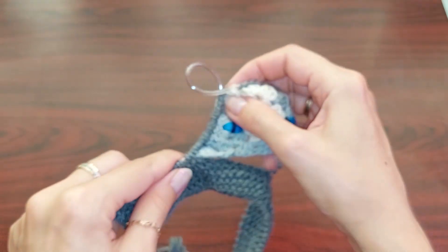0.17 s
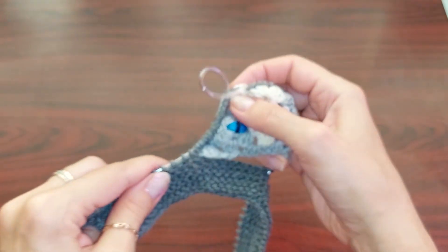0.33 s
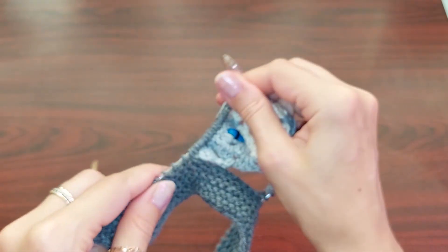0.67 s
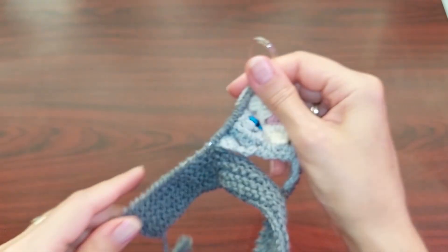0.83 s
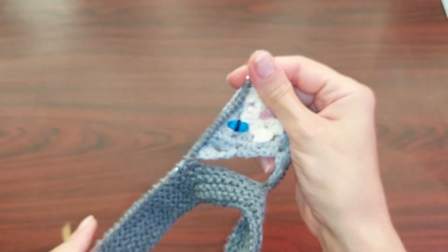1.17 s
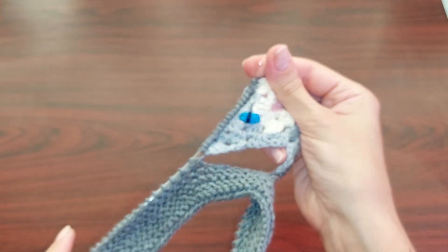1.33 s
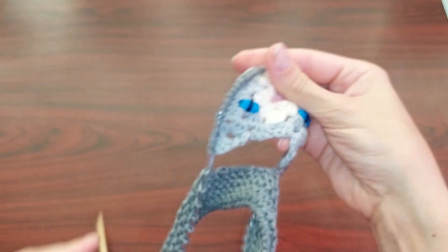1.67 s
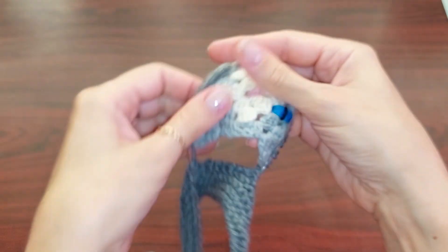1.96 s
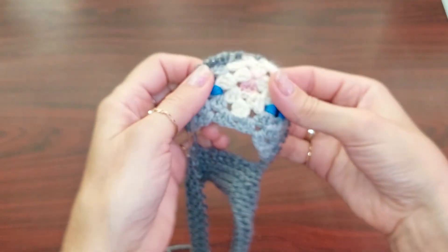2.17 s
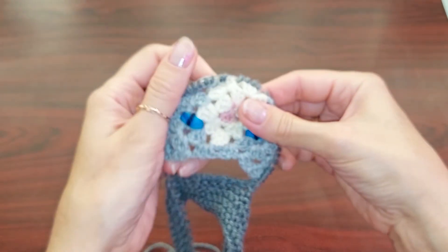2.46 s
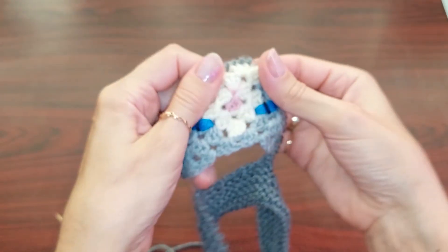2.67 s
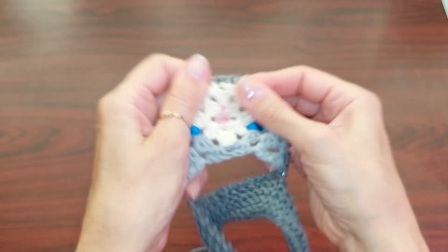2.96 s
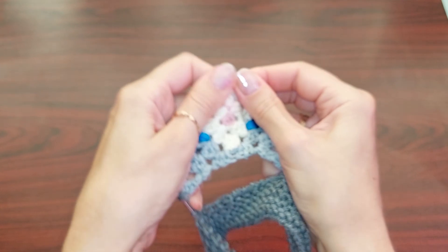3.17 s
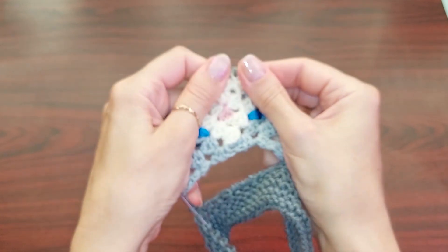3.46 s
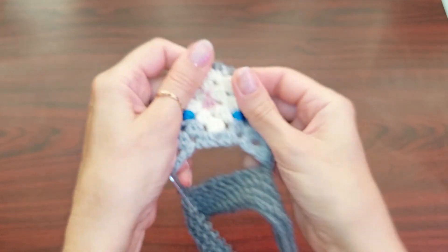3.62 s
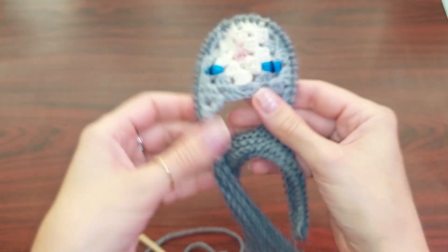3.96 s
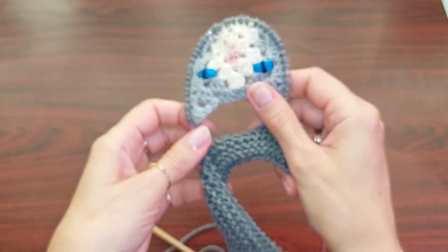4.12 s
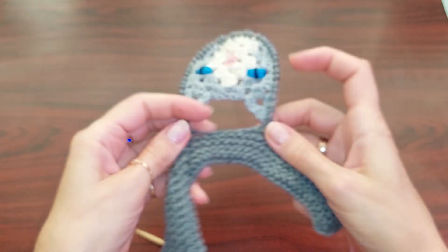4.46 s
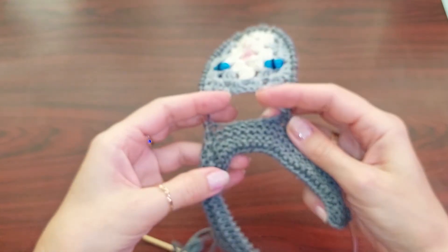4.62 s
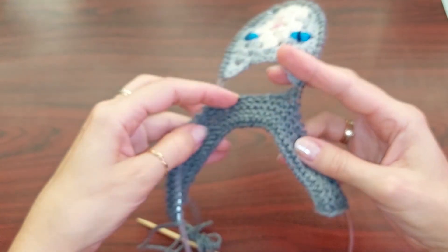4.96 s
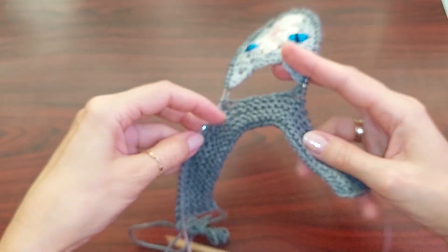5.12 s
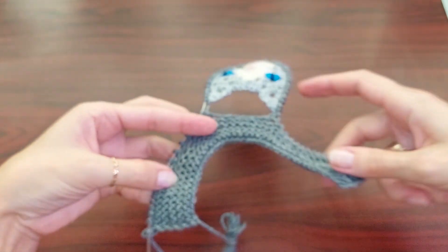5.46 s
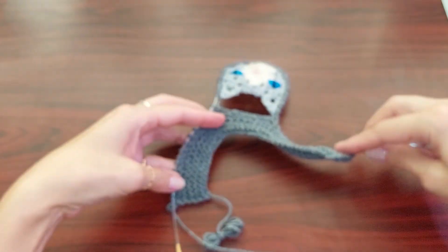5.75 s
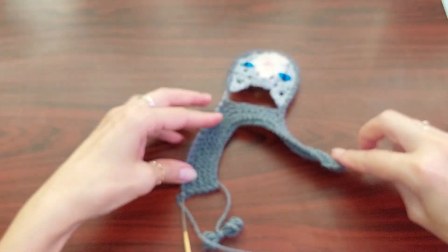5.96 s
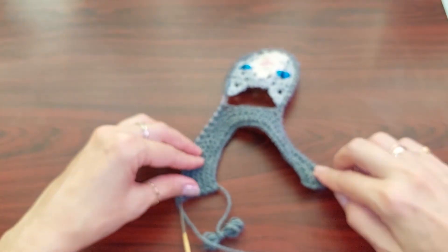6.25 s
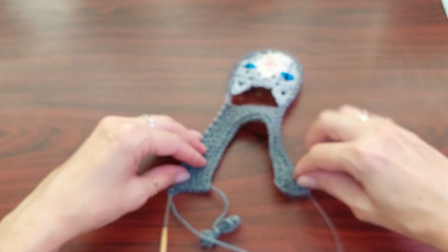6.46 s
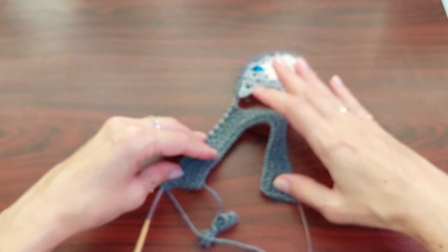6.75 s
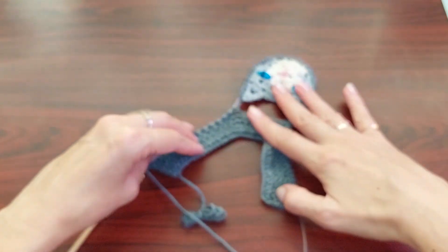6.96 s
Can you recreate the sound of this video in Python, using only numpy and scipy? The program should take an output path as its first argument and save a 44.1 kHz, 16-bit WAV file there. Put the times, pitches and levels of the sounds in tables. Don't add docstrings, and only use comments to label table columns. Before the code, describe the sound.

Knitting is handled over a tabletop, heard very near with a faint low room hush. Light needle ticks and taps come sparsely, some bright and metallic, some woody. An early quick, buzzing zip of cable through yarn swells and cuts off. Later come fingers brushing stitches, faint wooden drags, a strong ringing click followed by a soft hand thud, and a final rustle with a tap.

```python
import sys
import numpy as np
from scipy import signal
from scipy.io import wavfile
from scipy.ndimage import uniform_filter1d

SR = 44100
rng = np.random.default_rng(int(sys.argv[2]) if len(sys.argv) > 2 else 0)


def generate_wav(signal):
    frames = np.transpose(np.atleast_2d(signal))
    scaled = np.clip(frames, -1, 1) * 32767
    pcm = np.round(scaled).astype(np.int16)
    wavfile.write(sys.argv[1], SR, pcm)


N = 312565


def gain_of(db):
    return 10 ** (np.asarray(db) / 20)


def evened(x):
    return x / np.sqrt(np.mean(x ** 2) + 1e-20)


def steadied(z, share, size):
    swell = np.sqrt(abs(uniform_filter1d((abs(z) ** 2).mean(0), size=size)) + 1e-20)
    return evened(z.real / swell ** share)


def read(points, hz):
    f, value = np.transpose(points)
    return np.interp(np.log(hz + 1), np.log(f + 1), value)


def colour(x, points):
    level_db = np.maximum(read(points, abs(np.fft.fftfreq(8192, 1 / SR))), -100)
    log_gain = np.log(gain_of(level_db))
    phase = signal.hilbert(log_gain).imag
    taps = np.fft.ifft(np.exp(log_gain - 1j * phase)).real[:4096]
    return signal.oaconvolve(x, taps[None], axes=1)[:, :N]


def modes(x, table):
    return sum(gain_of(db) * signal.lfilter(*signal.iirpeak(hz, hz / width, SR), x)
               for hz, width, db in table)


def dying(s, db, t60):
    power = np.zeros(N)
    np.add.at(power, (np.asarray(s) * SR).astype(int), gain_of(db) ** 2)
    return np.sqrt(signal.lfilter([1], [1, -gain_of(-120 / (t60 * SR))], power))


# frequency in Hz, left-right correlation from 0 to 1.
CHANNEL_LIKENESS = [(60, 0.18), (180, 0.5), (550, 0.55), (1650, 0.057), (4970, 0.025), (15000, 0.023)]


def air(patchy_db):
    frames, hz = N // 256 + 5, np.fft.rfftfreq(512, 1 / SR)
    a, b, c, d, patches = rng.standard_normal((frames, 257, 5)).T
    patches = uniform_filter1d(patches, size=3, axis=0)
    patches = evened(uniform_filter1d(patches, size=16, axis=1))
    same = np.clip(read(CHANNEL_LIKENESS, hz), -1, 1)[:, None]
    left = a + 1j * b
    right = same * left + np.sqrt(1 - same ** 2) * (c + 1j * d)
    z = np.array([left, right]) * gain_of(patchy_db * patches)
    return evened(signal.istft(z, window="cosine", nperseg=512, noverlap=256)[1][:, :N])


def grainy(spread_db, per_s):
    size = np.minimum(rng.exponential(1, N), 4)
    catches = (rng.random(N) < per_s / SR) * gain_of(spread_db * size)
    patchy = air(patchy_db=2.5)
    return patchy * (1 + signal.lfilter([1], [1, -gain_of(-60 / (0.0057 * SR))], catches))


def strokes(table, attack_s=0.031):
    release_db_per_s = 193.5
    t, power = np.arange(0, N, 32) / SR, 0
    for start, length, first_db, last_db in table:
        db = np.interp(t, [start, start + length], [first_db, last_db])
        db = db - release_db_per_s * np.maximum(t - start - length, 0)
        power = power + (gain_of(db) * np.clip((t - start) / attack_s + 1, 0, 1)) ** 2
    return np.interp(np.arange(N) / SR, t, np.sqrt(power))


# start in seconds, peak in dB, then wood weight, metal sizzle
# and room tail in dB relative to the peak.
CLICKS = [(0.027, -58.5, 8.5, -14, -5.5), (0.3688, -36, -9, -3, -12.5), (0.6037, -31.5, -8, -0.3, -7),
          (1.1413, -38, -10, -14.5, -45), (1.767, -51, -25, 17.5, -24.5), (2.1294, -46.5, 0, -6, -40),
          (2.189, -46.5, -8.5, -7.5, -9.5), (2.303, -37, -18, -1.5, -10.5), (2.8417, -38, 0, 3, -11),
          (2.925, -40.5, 2, -17, -14), (3.224, -37.5, -4, -5.5, -7), (3.401, -43, -36, -12.5, -9),
          (3.535, -47, -3, 3, -9), (3.7426, -70, -0.5, -1, 1), (4.3844, -47.5, -13.5, 0, -11.5),
          (4.589, -31.5, -0.5, 7.5, -16.5), (4.7494, -51.5, -3, -2, -4.5), (5.0469, -26.5, -14, -7, -10),
          (5.5815, -18, -6.5, -4, -17.5), (6.1847, -54, 8, -43, -10), (6.344, -60, -23, -6, 3),
          (6.725, -42, -14.5, -13, -12), (2.824, -27, -15, -17, -25), (3.04, -63, 10, -18, -31),
          (3.069, -60.5, 1, -18, -22), (3.1, -54.5, -2.5, -11, -22)]
# the same five columns, in seconds and dB.
TAPS = [(0.2156, -39.5, -3, 2, -15), (0.4319, -37.5, -3, -9, -11), (0.816, -46, -38, -6, -55.5),
        (1.0248, -50, -11, -3, -10.5), (1.5466, -59, -4, -4.5, -5), (1.95, -65, 2, 8.5, -15),
        (2.4812, -45, -2.5, -9, -11.5), (2.62, -58, -0.5, -14, -6.5), (3.1944, -39.5, -6, 8, -11.5),
        (3.783, -39, -6, -8.5, -12.5), (4.0231, -42, -5, -8, -11), (4.165, -49, -2, -6, -14),
        (4.2792, -52.5, -1.5, -2, -14), (4.671, -47.5, -2, 1, -4), (5.632, -31.5, 2, -7, -16.5),
        (5.8192, -45, -14, -28, -19), (5.943, -52.5, -1.5, -13, -17.5), (6.5644, -56.5, -24.5, -4.5, -18),
        (7.0252, -34.5, -8, -5, -10)]
# low edge in Hz, high edge in Hz, ring t60 in seconds, room t60 in seconds.
TICK_PARTS = [
    (3210, 6600, 0.0079, 0.31),
    (217, 910, 0.0099, 0.4),
    (1300, 3060, 0.0049, 0.35),
    (7780, 21900, 0.013, 0.21),
]
# frequency in Hz, level in dB.
NEEDLE_COLOUR = [(150, -8), (320, 5.5), (550, 5), (850, -3.5), (1400, -2.5), (2000, -4), (3000, -5.5),
                 (4600, -6.5), (6200, -6.5), (7200, -1.5), (8400, 5), (10000, 0.5), (12000, 7), (15500, -6)]


def ticks():
    s, bright_db, wood_db, sizzle_db, tail_db = np.transpose(CLICKS + TAPS)
    knock_db = wood_db + np.repeat([-20, -12], [len(CLICKS), len(TAPS)])
    part_db = [bright_db, bright_db + knock_db, bright_db + wood_db, bright_db + sizzle_db]
    crack_s, tail_delay_s = 0.013, 0.0025
    near, far = air(patchy_db=2.0), air(patchy_db=1.5)
    out = 0
    for (lo, hi, ring, t60), db in zip(TICK_PARTS, part_db):
        crack = uniform_filter1d(dying(s, db + 0.5, crack_s), size=16, origin=7)
        direct = np.hypot(crack, dying(s, db - 17.0, ring))
        early = dying(s, db + tail_db - 8.0, 0.46 * t60)
        late = uniform_filter1d(dying(s + tail_delay_s, db + tail_db + 4.5, t60), size=90)
        burst = near * direct + far * np.hypot(early, late)
        burst[:, (s * SR).astype(int)] += gain_of(db + 2.0)
        band = signal.butter(N=3, Wn=[lo, hi], btype="band", fs=SR, output="sos")
        out = out + signal.sosfilt(band, burst) * np.sqrt(SR / 2 / (hi - lo))
    return colour(out, NEEDLE_COLOUR)


def singing(table, width_hz, below_db, alike):
    t, out = np.arange(SR // 3) / SR, np.zeros((2, N + SR))
    for s, db, hz, t60 in table:
        line = modes(rng.standard_normal((2, len(t))), [(hz, width_hz, 0)])
        line = steadied(line, 0.6, size=int(SR / width_hz))
        line[1] = alike * line[0] + np.sqrt(max(1 - alike ** 2, 0)) * line[1]
        decay = gain_of(-60 * t / t60) + gain_of(9.5 - 60 * t / 0.012)
        fade = gain_of(db - below_db) * decay * np.minimum(t * hz / 3, 1)
        out[:, round(s * SR):][:, :len(t)] += line * fade
    return out[:, :N]


# start in seconds, peak in dB, frequency in Hz, t60 in seconds.
RINGS = [(0.2148, -48.5, 1300, 0.33), (0.432, -38.5, 1770, 0.27), (0.602, -69, 1480, 0.28),
         (0.815, -49, 1330, 0.3), (1.024, -53.5, 1600, 0.83), (2.3017, -51, 2670, 0.46),
         (2.481, -49.5, 1640, 0.27), (2.8409, -39, 1970, 0.38), (2.9253, -71, 1600, 0.2),
         (3.2246, -36.5, 2030, 0.28), (3.3998, -53.5, 1660, 0.47), (4.0223, -97, 1750, 0.35),
         (4.588, -29.5, 1930, 0.28), (5.0466, -34.5, 1990, 0.39), (5.5807, -20.5, 2003, 0.24),
         (6.1848, -46, 1940, 0.53), (4.166, -53.5, 1380, 0.34), (4.279, -58, 1570, 0.3),
         (2.621, -58, 1695, 0.74), (6.7244, -55, 1790, 1), (4.39, -59, 2650, 0.7), (5.47, -56.5, 2020, 0.7),
         (5.258, -53.5, 1450, 1), (5.38, -55.5, 1573, .4)]
# start in seconds, peak in dB, frequency in Hz, t60 in seconds.
PINGS = [(0.3691, -37.5, 6660, 0.19), (0.4334, -32, 8150, 0.28), (0.605, -22, 8540, 0.3),
         (1.7674, -34.5, 7300, 0.041), (2.3027, -45, 4800, 0.19), (2.8414, -30, 4000, 0.28),
         (3.1946, -30.5, 5800, 0.21), (3.2241, -25, 6460, 0.26), (3.5349, -32.5, 5140, 0.27),
         (4.588, -20, 4180, 0.25), (5.0469, -29, 8470, 0.32), (5.5807, -12, 4710, 0.27),
         (7.0259, -30.5, 8140, 0.14), (5.755, -35, 3500, 0.23), (4.3845, -39.5, 6560, 0.18),
         (4.166, -53, 3400, .1)]
# start in seconds, peak in dB, frequency in Hz, t60 in seconds.
KNOCKS = [(0.215, -39.5, 280, 0.46), (0.43, -46, 544, 0.54), (0.603, -40.5, 278, 0.56),
          (0.814, -49.5, 242, 0.37), (1.024, -59, 423, 0.33), (2.482, -64, 580, 0.28),
          (3.193, -46, 474, 0.54), (3.783, -47, 607, 0.91), (4.165, -49, 374, 0.21),
          (4.278, -51.5, 335, 0.41), (4.672, -40, 337, 0.5), (5.045, -46.5, 330, 0.55),
          (5.634, -36, 232, 0.47)]


def ringing_modes():
    lines = singing(RINGS, width_hz=170, below_db=10.5, alike=0.18)
    lines += singing(PINGS, width_hz=800, below_db=18.0, alike=0.28)
    lines += singing(KNOCKS, width_hz=45, below_db=15.0, alike=0.81)
    return lines


# start in seconds, strength in dB.
SLACK_SLIPS = [(1.1781, -60.6), (1.1804, -40.8), (1.1857, -40.9), (1.1889, -39.5), (1.1919, -40.3),
               (1.1974, -39.8), (1.2006, -39.3), (1.2049, -39.1), (1.2076, -45.4), (1.2117, -37.2),
               (1.2143, -38.9), (1.2171, -39.0), (1.22, -37.9), (1.2229, -37.8), (1.2265, -38.2),
               (1.2304, -38.2), (1.2359, -37.6), (1.2388, -36.4), (1.242, -37.7), (1.2447, -37.1),
               (1.2473, -38.9), (1.2503, -37.2), (1.2533, -38.4), (1.2563, -36.4), (1.2593, -44.7),
               (1.262, -34.6), (1.2644, -36.3), (1.2671, -36.8), (1.27, -37.4), (1.2731, -38.9),
               (1.276, -34.2), (1.2797, -36.7), (1.2822, -36.3), (1.286, -38.2), (1.289, -36.4),
               (1.2922, -35.2), (1.2964, -34.5), (1.2999, -38.2), (1.3022, -35.1), (1.3059, -36.4)]
# start in seconds, strength in dB.
TAUT_SLIPS = [(1.3132, -31), (1.3156, -33), (1.3221, -30), (1.3291, -29), (1.3369, -29), (1.3432, -29),
              (1.3515, -28), (1.3607, -26), (1.3677, -27), (1.3746, -27), (1.3835, -26), (1.3873, -26),
              (1.3947, -24), (1.4018, -24), (1.408, -25), (1.413, -25), (1.4168, -25), (1.42, -27),
              (1.4235, -25), (1.4262, -28), (1.4289, -27), (1.4313, -28), (1.4343, -29)]
# frequency in Hz, t60 in seconds, level in dB while slack, level in dB once taut.
CABLE_MODES = [(1078, 0.007, -5, -1.5), (1871, 0.004, 3.2, 5.6), (2448, 0.003, 11.6, 9.5),
               (3560, 0.007, -6, -6), (4480, 0.0059, 0.5, -1), (5775, 0.0032, 10.9, 5.3),
               (6950, 0.004, 3, -5), (8100, 0.003, 9, 2.5), (10600, 0.0025, 5, -2), (12100, 0.0025, 6, -1)]


def rasp():
    s, db = np.transpose(SLACK_SLIPS + TAUT_SLIPS)
    tighten_s, tighten_length_s, fuller_db_per_s = 1.295, 0.04, 80
    taut = np.clip((s - tighten_s) / tighten_length_s, 0, 1)
    t, out = np.arange(600) / SR, np.zeros((2, 2 * SR))
    scatter_db, detune = rng.standard_normal((90, 2, 2, len(CABLE_MODES), 1)).swapaxes(0, 1)
    scatter_db, detune = 0.8 * scatter_db, 1 + 0.004 * detune
    onset = np.minimum(t / 0.0006, 1)
    hz, t60, slack_db, taut_db = np.transpose(CABLE_MODES)[..., None]
    order = np.arange(len(hz))[:, None]
    lag = np.where(order < 3, np.pi * (order == 2), np.pi / 2 * order)
    scratch = np.diff(rng.standard_normal((90, 2, len(t) + 1)))
    scratch = scratch * gain_of(-60 * t / 0.006) * onset
    for k, at in enumerate((s * SR).astype(int)):
        level_db = db[k] + slack_db + taut[k] * (taut_db - slack_db) + scatter_db[k]
        level_db[:, 0] += fuller_db_per_s * (s[k] - s.max())
        rings = gain_of(level_db - 60 * t / t60) * np.sin(2 * np.pi * hz * detune[k] * t + lag)
        scrape = scratch[k] * gain_of(db[k] - 3.5 - 5.7 * taut[k])
        out[:, at:at + len(t)] -= rings.sum(1) * onset + scrape
    direct = signal.sosfilt(signal.butter(N=4, Wn=600, btype="high", fs=SR, output="sos"), out)
    direct = direct + gain_of(-18) * np.roll(direct, round(0.0021 * SR), axis=1)
    t = np.arange(SR // 4) / SR
    tail = rng.standard_normal((2, 3, len(t)))
    tail = tail * (gain_of(-36.0 - 60 * t / 0.077) + gain_of(-38.0 - 60 * t / 0.23))
    a, b = int(s.min() * SR), int(s.max() * SR) + 600
    turn, wet = np.arange(b - a) * np.pi * 30 / SR, np.zeros((2, 2 * SR))
    for k in range(3):
        moving = direct[:, a:b] * np.cos(turn + k * np.pi / 3)
        echoes = signal.fftconvolve(moving, tail[:, k], axes=1)
        wet[:, a:a + echoes.shape[1]] += echoes
    return np.pad(gain_of(-3.0) * (direct + wet), [(0, 0), (0, N - 2 * SR)])


# time in seconds, level in dB, first bar mode
# in Hz, upper modes in dB relative.
DRAGS = [
    [(2.66, -73, 553, 10), (2.688, -66, 560, -6), (2.714, -76, 566, 4), (2.75, -61.5, 564, 5),
     (2.77, -72, 550, 14), (2.784, -55.5, 604, -0.5), (2.806, -63, 560, -6), (2.835, -72, 577, 6)],
    [(3.778, -50, 597, 3), (3.794, -55, 615, -3), (3.816, -63, 570, -4), (3.844, -65, 580, 2),
     (3.85, -63, 537, -9), (3.888, -59, 605, -1.5), (3.934, -56.5, 530, -2.5), (3.962, -56, 593, -5),
     (3.98, -69, 610, 1)],
    [(6.88, -64, 600, 8), (6.89, -69, 527, 9), (6.912, -60.5, 647, -8), (6.928, -54, 595, 4),
     (6.936, -61, 570, 3), (6.944, -57, 590, 3), (6.956, -61.5, 464, 5), (6.998, -55.5, 467, -4),
     (7.03, -60, 475, 3)],
]
# ratio to the first mode, width in Hz, level in dB.
BAR_MODES = [(1.0, 75, 0), (2.8, 260, -1.5), (5.1, 500, -8)]


def drag():
    out = np.zeros((2, N))
    stutter = grainy(spread_db=7.0, per_s=130)
    for rows in map(np.array, DRAGS):
        a, b = (rows[[0, -1], 0] * SR).astype(int)
        t = np.arange(a, b) / SR
        level_db, hz, upper_db = (np.interp(t, rows[:, 0], c) for c in rows.T[1:])
        for k, (ratio, width, db) in enumerate(BAR_MODES):
            turn = np.exp(2j * np.pi * np.cumsum(ratio * hz) / SR)
            r = np.exp(-np.pi * width / SR)
            line = turn * signal.lfilter([1], np.poly([r, r]), stutter[:, a:b] / turn)
            gain = gain_of(level_db + db + (k > 0) * upper_db) * signal.windows.tukey(b - a, 0.04)
            out[:, a:b] += steadied(line, 0.7, size=500) * gain
    return out


# start in seconds, length in seconds, level in dB at start, level in dB at end,
# tip hiss in dB relative.
SKIDS = [
    (6.8, 0.073, -68, -57, -15),
    (6.352, 0.068, -61, -57.5, 3.5),
    (2.935, 0.016, -51.5, -74, 4.5),
    (3.235, .05, -54, -58, -13),
]
# start in seconds, length in seconds, level in dB at start, level in dB at end.
HEAVY_SKIDS = [(6.192, 0.058, -55, -60), (5.91, 0.07, -74, -65), (.825, .04, -73, -71),
               (3.24, 0.06, -60, -63), (5.26, 0.14, -67, -68), (5.73, 0.06, -66, -63),
               (6.83, 0.07, -64, -60), (2.86, .03, -65, -66), (1.77, .06, -72, -72)]
# frequency in Hz, width in Hz, level in dB.
SHAFT = [(1530, 590, -6.5), (1940, 310, 2), (2400, 1000, -2)]
# frequency in Hz, width in Hz, level in dB.
TIP = [(4970, 1100, -1), (6900, 6900, 0)]
# frequency in Hz, width in Hz, level in dB.
BOARD = [(990, 180, 1), (1330, 350, -3)]


def skid():
    shaft = evened(modes(modes(grainy(spread_db=-18.0, per_s=290), SHAFT), SHAFT))
    tip = evened(modes(modes(grainy(spread_db=-7.0, per_s=53), TIP), TIP))
    board = evened(modes(modes(grainy(spread_db=2.0, per_s=83), BOARD), BOARD))
    shaft_strokes = [row[:4] for row in SKIDS]
    tip_strokes = [(s, length, a + db, b + db) for s, length, a, b, db in SKIDS]
    out = board * strokes(HEAVY_SKIDS, attack_s=0.0047)
    out = out + shaft * strokes(shaft_strokes, attack_s=0.009)
    return out + tip * strokes(tip_strokes, attack_s=0.016)


# start in seconds, length in seconds, level in dB at start,
# level in dB at end, yarn fuzz in dB relative.
RUBS = [(0.0, 0.13, -72.5, -61, -6), (0.26, 0.045, -63, -62, 3.5), (0.835, 0.02, -65.5, -70.5, 4),
        (1.046, 0.37, -61.5, -59, 1), (1.471, 0.16, -66.5, -67.5, -0.5), (1.729, 0.048, -71.5, -57.5, 2),
        (1.942, 0.19, -71, -65, 2.5), (2.316, 0.068, -56.5, -54.5, 3.5), (2.623, 0.17, -76, -63.5, -5),
        (2.913, 0.23, -71, -78, 2.5), (3.424, 0.039, -73, -67, -23), (3.56, 0.14, -86, -77.5, 6),
        (3.76, 0.14, -70, -56, -0.5), (4.02, 0.14, -59, -74.5, -2), (4.362, .12, -85, -69.5, 7),
        (4.614, 0.14, -41, -58, -6), (4.749, 0.04, -52.5, -61, -2.5), (5.08, 0.18, -57, -63, 1),
        (5.258, 0.14, -61.5, -61.5, -1), (5.435, 0.16, -65, -65, -4), (5.67, 0.11, -53.5, -58, -2),
        (5.89, 0.041, -70, -65, -9), (6.77, 0.047, -70, -56, -5), (6.831, 0.087, -51.5, -50.5, -0.5),
        (6.946, 0.07, -55, -56, -8.5), (7.038, 0.06, -52, -53, -5)]
# start in seconds, length in seconds, level in dB at start,
# level in dB at end.
SLIDES = [(0.25, 0.085, -63, -93), (0.82, 0.043, -65.5, -70), (1.04, 0.15, -63.5, -77),
          (1.24, 0.045, -69, -65), (1.47, 0.02, -63, -74), (1.78, .03, -70, -73), (2.0, 0.28, -76, -84),
          (2.32, 0.064, -65.5, -88), (2.63, 0.23, -88, -77), (2.93, 0.084, -66.5, -80),
          (3.78, 0.15, -65.5, -69), (4.01, 0.079, -66, -81), (4.63, 0.1, -56.5, -67),
          (4.745, 0.024, -54, -77), (5.1, 0.13, -66.5, -85), (5.68, 0.37, -63.5, -80.5),
          (5.9, 0.17, -68.5, -78.5), (6.2, 0.14, -71.5, -87), (6.83, 0.067, -74.5, -64.5),
          (6.93, 0.08, -62, -63), (7.04, 0.06, -59, -55), (6.36, 0.11, -81, -75.5), (3.23, 0.058, -66, -64)]
# frequency in Hz, width in Hz, level in dB.
SLIDE_MODES = [(337, 126, 4.5), (500, 200, 1.5), (714, 470, -4)]
# frequency in Hz, width in Hz, level in dB.
RUB_MODES = [(1240, 610, -2), (1720, 860, 5.5), (2680, 1000, 0.5), (3400, 1400, -3.5)]
# frequency in Hz, level in dB per Hz.
FUZZ_COLOUR = [(2500, -13), (3500, -6.5), (5000, 4), (8000, 2), (12000, -2), (16000, -4)]


def handling():
    slide = evened(modes(modes(grainy(spread_db=0.5, per_s=120), SLIDE_MODES), SLIDE_MODES))
    rub = evened(modes(modes(grainy(spread_db=-5.0, per_s=76), RUB_MODES), RUB_MODES))
    fuzz = evened(colour(grainy(spread_db=1.0, per_s=360), FUZZ_COLOUR))
    fingers = [row[:4] for row in RUBS]
    fibres = [(s, length, a + db, b + db) for s, length, a, b, db in RUBS]
    return slide * strokes(SLIDES) + rub * strokes(fingers) + fuzz * strokes(fibres)


# start in seconds, frequency in Hz, t60 in seconds, level in dB.
THUDS = [
    (5.634, 135, 0.12, -36),
]


def thud():
    (s, hz, t60, db), = THUDS
    t = np.maximum(np.arange(N) / SR - s, 0)
    return gain_of(db - 60 * t / t60) * np.sin(2 * np.pi * hz * t) * np.minimum(t / 0.0071, 1)


# frequency in Hz, level in dB per Hz.
HUSH_COLOUR = [(24, -38.5), (40, -5), (159, -5), (252, -17), (291, -9), (389, -18.5), (533, -21),
               (601, -22), (712, -25), (1370, -27.5), (4070, -36.5), (6760, -36), (13000, -32)]


def room_hush():
    return gain_of(-73) * evened(colour(air(patchy_db=0.3), HUSH_COLOUR))


# time in seconds, left-right difference in dB.
HAND_PLACE = [(0.0, 0.5), (0.83, 1), (1.009, 0.5), (1.93, 2.5), (2.11, 1), (4.641, 0.5), (5.051, 0),
              (5.942, 0), (6.0, 1), (7.09, 0.5)]


def scene():
    place_db = np.interp(np.arange(N) / SR, *np.transpose(HAND_PLACE))
    side = gain_of(np.outer([0.5, -0.5], place_db))
    hands = ticks() + ringing_modes() + rasp() + drag() + skid() + handling()
    return hands * side + thud() + room_hush()


def low_pass(x):
    return signal.sosfilt(signal.butter(12, 17150, fs=SR, output="sos"), x)


# frequency in Hz, level in dB.
MIC_DIPS = [(600, 0), (850, -2.5), (1150, 0), (2000, -0.5), (2300, -1.5), (3600, -0.5), (4080, -4),
            (4500, -0.5)]
# frequency in Hz, left-right difference in dB.
MIC_LEAN = [(40, -2), (150, 0), (550, 1.8), (1650, 1.5), (4970, -.8), (15000, -2.3)]
# treble level in dB, edge in Hz.
TREBLE_EDGE = [(-116, 12900), (-104, 13600), (-92, 14300), (-80, 15000), (-70, 15700), (-58, 17200)]


def record(dry):
    hz, _, z = signal.stft(colour(dry, MIC_DIPS), SR, nperseg=1024)
    z = z * gain_of(np.outer([0.5, -0.5], read(MIC_LEAN, hz)))[..., None]
    treble_db = 10 * np.log10((abs(z.mean(0)[232:290]) ** 2).mean(0) + 1e-20)
    band_hz = SR / 64
    edge_hz = np.interp(uniform_filter1d(treble_db, size=2), *np.transpose(TREBLE_EDGE))
    edge_hz = band_hz * np.round(edge_hz / band_hz)
    kept = signal.istft(z * (hz[:, None] < edge_hz), SR, nperseg=1024)[1][:, :N]
    return low_pass(kept)


dry = scene()
out = record(dry)
generate_wav(out)
```